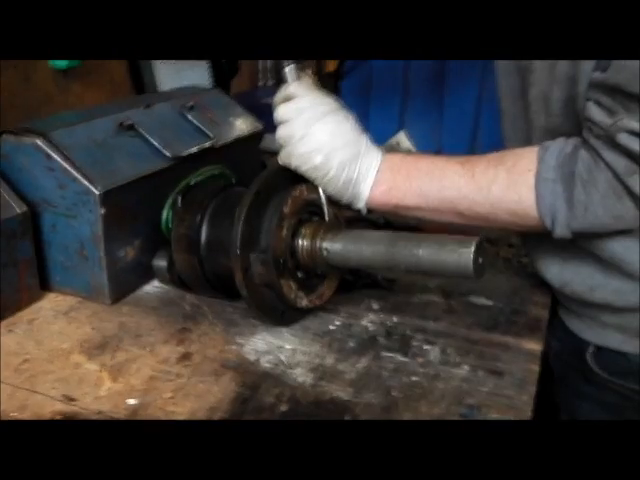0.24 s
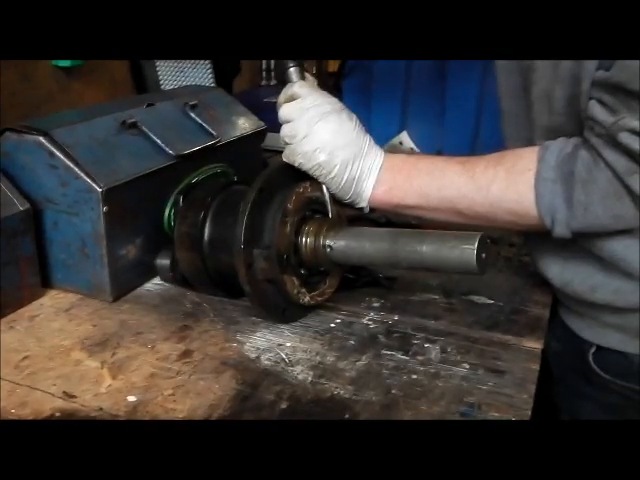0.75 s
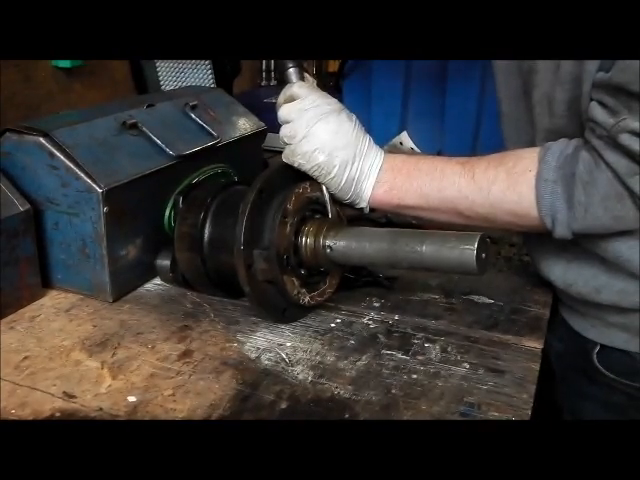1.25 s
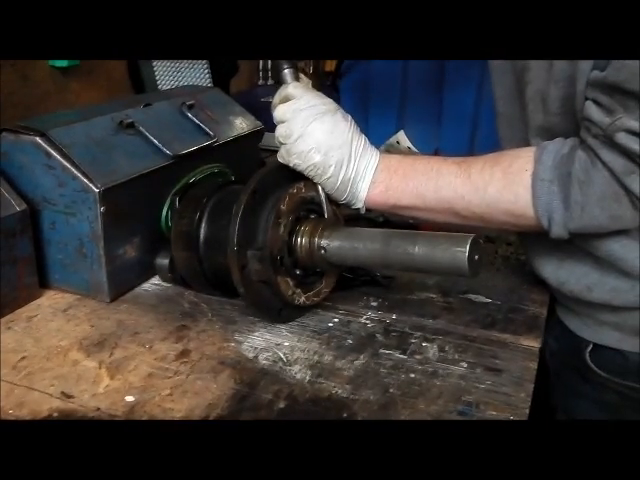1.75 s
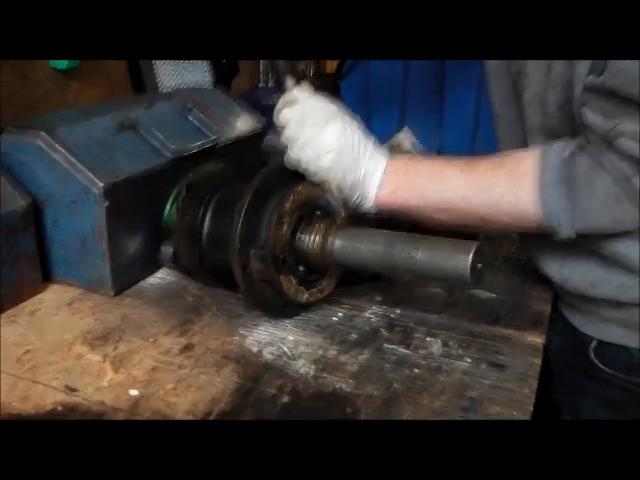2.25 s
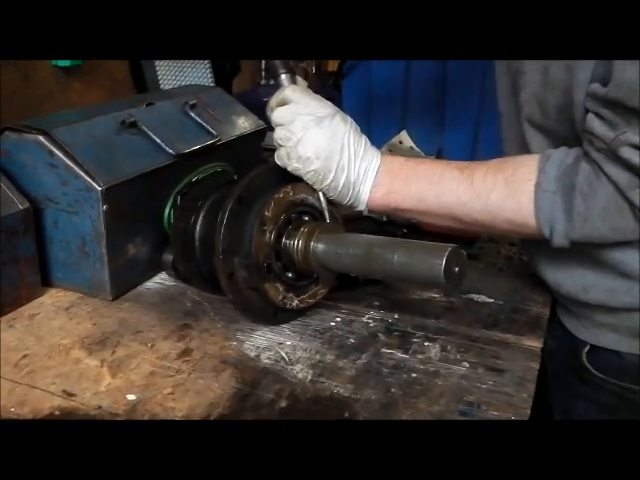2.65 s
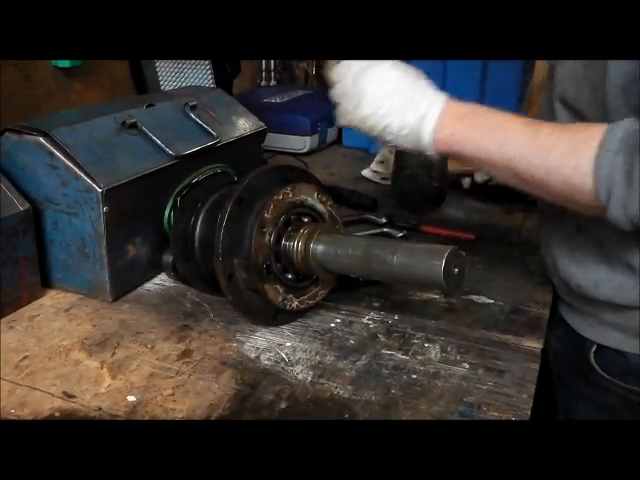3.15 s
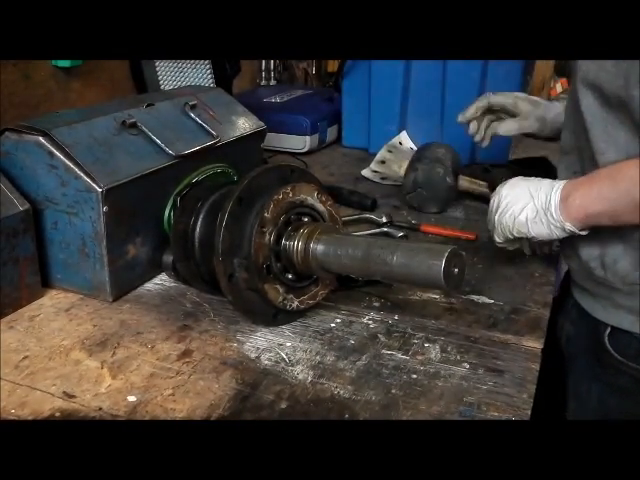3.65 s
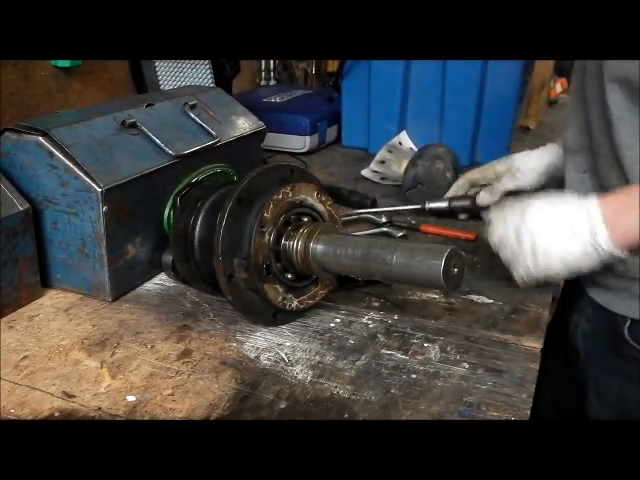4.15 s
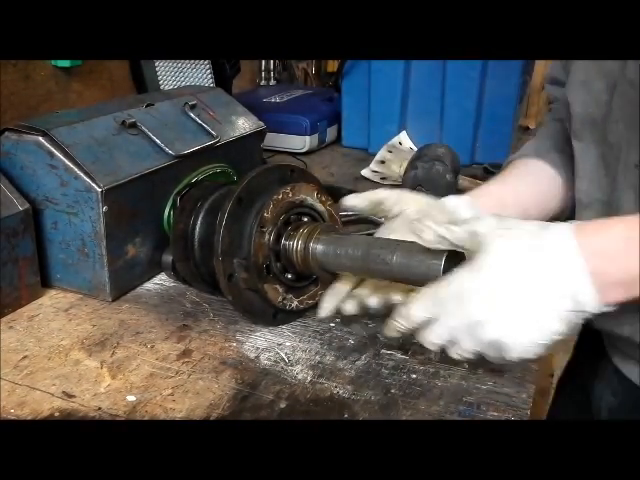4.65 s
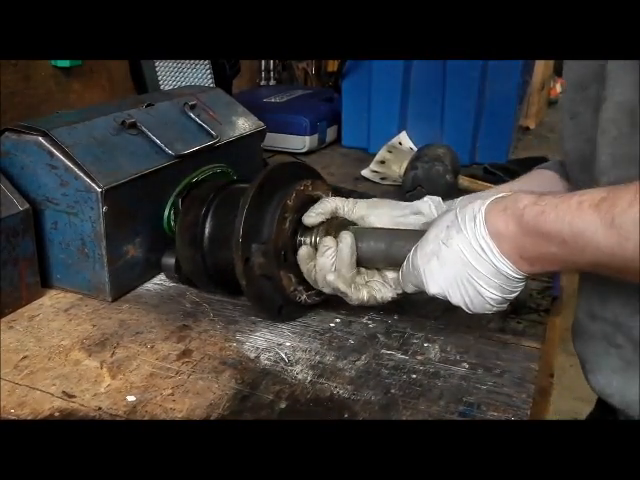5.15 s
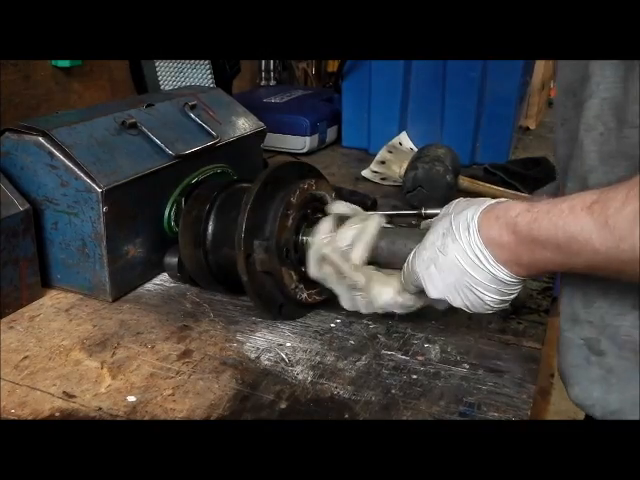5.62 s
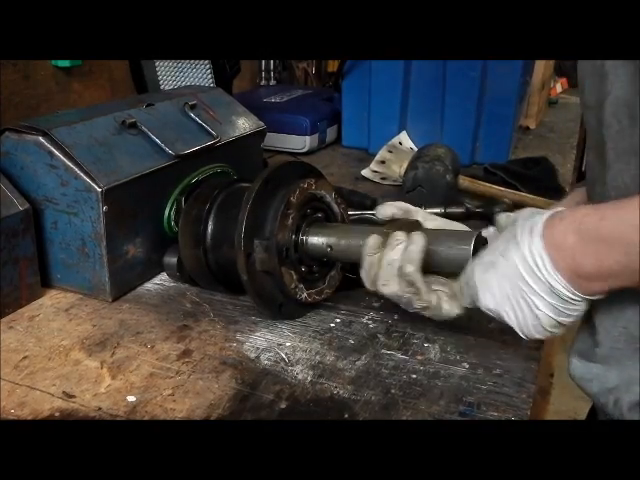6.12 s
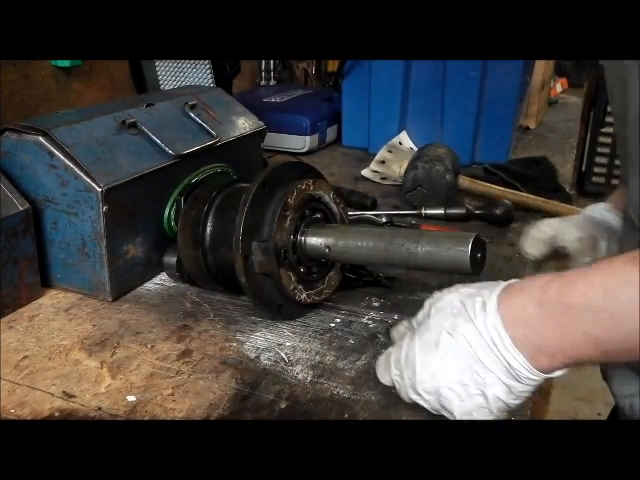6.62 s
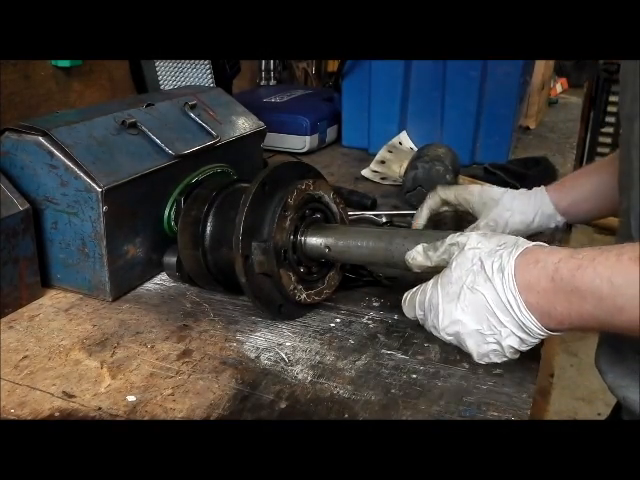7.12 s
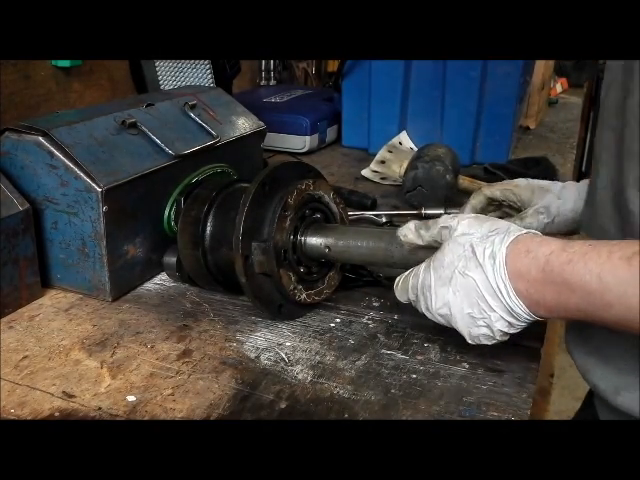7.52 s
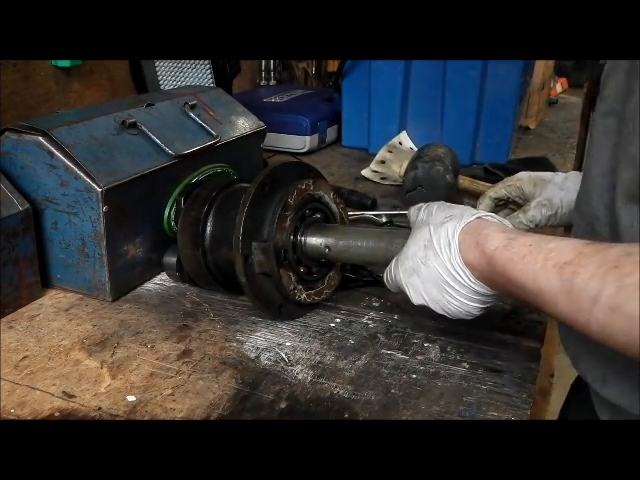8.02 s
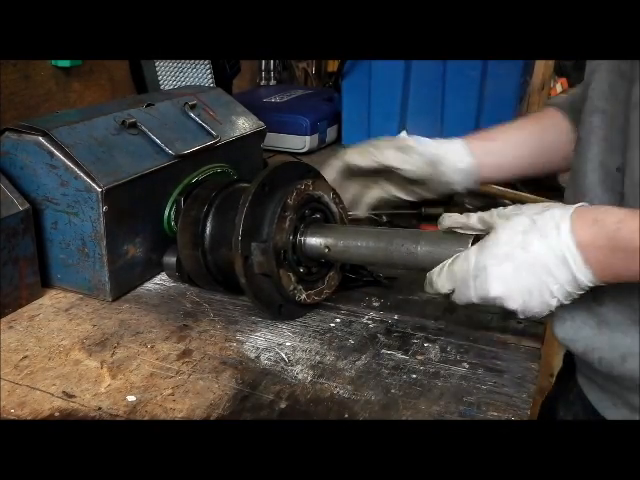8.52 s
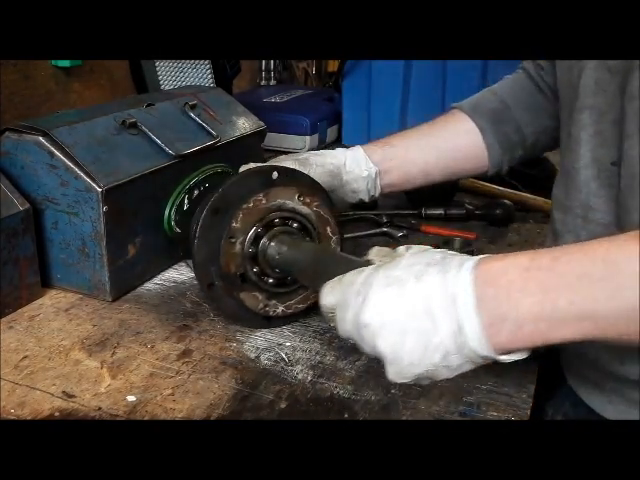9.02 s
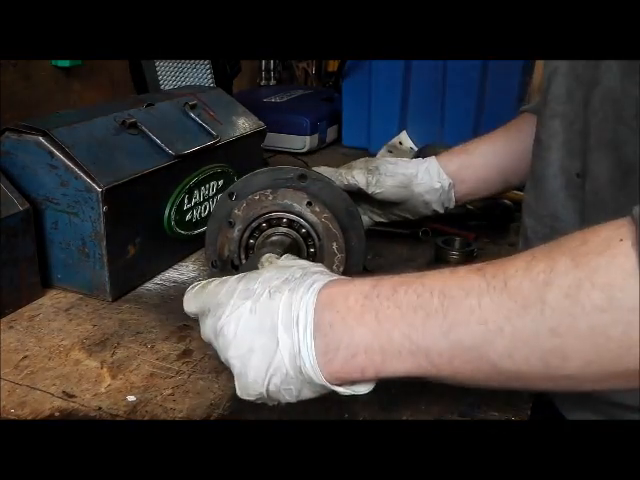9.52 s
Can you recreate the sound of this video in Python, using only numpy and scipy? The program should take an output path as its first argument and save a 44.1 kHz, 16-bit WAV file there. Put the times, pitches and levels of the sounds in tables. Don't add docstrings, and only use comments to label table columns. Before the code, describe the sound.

A mallet drives a chisel into a ringing steel hub with five bouncing, rattling blows, then tools clatter down and parts slide and clink.

```python
import sys
import numpy as np
from scipy import signal
from scipy.fft import rfft, irfft, next_fast_len
from scipy.io import wavfile
from scipy.ndimage import uniform_filter1d, map_coordinates

SR = 44100
rng = np.random.default_rng(int(sys.argv[2]) if len(sys.argv) > 2 else 0)


def generate_wav(signal):
    frames = np.transpose(np.atleast_2d(signal))
    scaled = np.clip(frames, -1, 1) * 32767
    pcm = np.round(scaled).astype(np.int16)
    wavfile.write(sys.argv[1], SR, pcm)


def undo_db(level):
    steps = np.asarray(level, float) / 20
    return 10 ** steps


N = 430857


def unit(x):
    return x / np.sqrt(np.mean(x ** 2) + 1e-20)


def along(points, hz):
    f, v = np.transpose(points)
    return np.interp(np.log(hz + 1), np.log(f + 1), v)


def level(rows):
    s, db = np.transpose(rows)
    return undo_db(np.interp(np.arange(N) / SR, s, db, -120, -120))


def strokes(rows):
    t = np.arange(0, N / SR + 0.002, 0.001)
    gain = sum(undo_db(db) * np.exp(-np.abs(2.34 * (t - s) / length) ** 3) for s, length, db in rows)
    return np.interp(np.arange(N) / SR, t, gain)


def wobble(rate):
    steps = np.arange(0, N + 32, 32)
    knots = rng.standard_normal(int(N * rate / SR) + 4)
    return np.interp(np.arange(N), steps, map_coordinates(knots, [steps * rate / SR]))


def filtered(x, response):
    n = x.shape[-1]
    m = next_fast_len(n + 4096)
    return irfft(rfft(x, m) * response(np.fft.rfftfreq(m, 1 / SR)), m)[..., :n]


def resonance(f, hz, width, gain_db):
    return undo_db(gain_db) * 1j * f * width / (hz * hz - f * f + 1j * f * width)


def modes(peaks, f):
    return sum((-1) ** k * resonance(f, *peak) for k, peak in enumerate(peaks))


def rush(response):
    m = next_fast_len(N)
    f = np.fft.rfftfreq(m, 1 / SR)
    spectrum = rng.standard_normal((2, len(f), 2)) @ [1, 1j]
    return unit(irfft(spectrum * response(f), m)[:, :N])


def echo(t):
    # frequency in Hz, reverberation time t60 in seconds.
    room_t60 = [(150, 0.43), (700, 0.34), (2000, 0.43), (5000, 0.33), (12000, 0.33)]
    hz = np.fft.rfftfreq(256, 1 / SR)
    frame = np.arange(len(t) // 128 + 2) * 128 / SR
    haze = rng.standard_normal((2, len(hz), len(frame), 2)) @ [1, 1j]
    dying = undo_db(-60 * frame / along(room_t60, hz)[:, None])
    tail = signal.istft(haze * dying, SR, nperseg=256)[1][:, :len(t)]
    lumps = np.interp(t * 220, np.arange(128), 2 * rng.standard_normal(128))
    build_up = (1 - np.exp(-t / 0.0065)) ** 2
    return undo_db(lumps) * tail * build_up * np.clip((t[-1] - t) / 0.05, 0, 1)


def contacts(rows, peaks, crack_db, crack_t60, room_db, rattle_db, far_ring):
    out, lead, size = np.zeros((2, N + SR)), 200, 20000
    t = np.maximum(np.arange(size) - lead, 0) / SR
    f = np.fft.rfftfreq(size, 1 / SR) + 1
    hz, width, gain_db = np.transpose(peaks)[:, :, None]
    sign = (-1) ** np.arange(len(peaks))[:, None]

    def detuned(spread):
        pitch = hz * (1 + spread * rng.standard_normal(hz.shape))
        return sign * resonance(f, pitch, width, gain_db)

    blow = (undo_db(-60 * t / crack_t60) + 1.2 * undo_db(-60 * t / 0.0049)) * (1 - np.exp(-t / 0.00072))
    for s, db, low_db, high_db, top_db, wet_db in rows:
        knocks = (rng.random(size) < 90 / SR) * (t > 0)
        knocks = knocks * undo_db(rattle_db - 60 * t / 0.4 + 2.0 * rng.standard_normal(size))
        crack = blow + np.convolve(knocks, undo_db(-60 * t[lead:2 * lead] / 0.0034))[:size]
        loose = rfft(knocks) * detuned(0.05).sum(axis=0)
        each = detuned(0.006)
        kicks = np.zeros(size)
        kicks[lead] = 1
        kicks[lead + rng.integers(20, 280, size=3)] = rng.uniform(-0.45, 0.45, size=3)
        colour = undo_db(along([(50, low_db - 27), (120, low_db + 9.5), (250, low_db + 8.5), (500, low_db + 16.5),
                            (1500, 0), (4200, high_db + 2), (7500, top_db), (15000, top_db - 10.5)], f))
        strengths = undo_db(2.2 * rng.standard_normal((2, len(peaks))))
        sides = np.array([np.ones(len(peaks)), rng.choice([-1, 1], len(peaks))])
        ring = (strengths * sides) @ each
        noise = rfft(rng.standard_normal((2, size)) * crack) / np.linalg.norm(blow)
        hit = irfft(colour * (undo_db(crack_db) * noise + rfft(kicks) * ring + loose * [[1], [0.7]]))
        wet = irfft(rfft(echo(t)) * colour * (undo_db(crack_db) + far_ring * ring[0]))
        wet = wet * undo_db(room_db + wet_db) * np.linalg.norm(hit[0]) / np.linalg.norm(wet[0])
        at = max(round(s * SR), 0)
        out[:, at:at + size] += (hit + wet) * undo_db(db) / np.abs(hit[0]).max()
    return out[:, lead:N + lead]


def family(rows, top_db, dry=0):
    return [(s, db, low_db, high_db, high_db + top_db, dry * db) for s, db, low_db, high_db in rows]


def ping(rows, clear, rough, room_db):
    out, t = np.zeros((2, N + SR)), np.arange(SR // 4) / SR
    for s, hz, db, t60 in rows:
        beat = 1 + 0.24 * np.sin(2 * np.pi * rng.uniform(32, 127) * t)
        span = max(2 + 5 * clear, round(0.7 * SR / hz))
        drift = uniform_filter1d(rng.standard_normal((2, len(t))), size=span)
        drift = unit(uniform_filter1d(drift, size=span))
        grit = clear * beat + rough * undo_db(-60 * t / 0.32) * drift
        turn = 2 * np.pi * hz * t
        shape = undo_db(db - 60 * t / t60) * (1 - np.exp(-t / (0.00025 + 0.14 / hz))) ** 2
        out[:, round(s * SR):][:, :len(t)] += shape * grit * [np.sin(turn), np.cos(turn)]
    tail = echo(np.arange(SR // 2) / SR)
    wet = signal.fftconvolve(out[:1], tail / np.linalg.norm(tail[0]), axes=1)
    return out[:, :N] + undo_db(room_db) * wet[:, :N]


def workshop_air():
    # frequency in Hz, level in dB per Hz.
    air_colour = [(18, -55), (30, -38), (71, -13), (103, -2), (127, -17), (153, -19), (272, -29),
                  (498, -20), (800, -20), (1040, -18.5), (5150, -21.5), (7840, -35), (9180, -35),
                  (15900, -42)]
    return undo_db(-40.5 + 0.98 * wobble(3.5)) * rush(lambda f: undo_db(along(air_colour, f)))


def mains_and_motors():
    # frequency in Hz, level in dB.
    motor_lines = [(833, -55), (1250, -82), (1890, -64.5)]
    t = np.arange(N) / SR
    tones = undo_db(-37.5 + 0.35 * wobble(4.4)) * np.sin(2 * np.pi * 100.22 * t)
    for hz, db in motor_lines:
        gain = undo_db(db + 2.0 + 0.49 * wobble(12.0))
        tones = tones + gain * np.sin(2 * np.pi * hz * t + 0.5 * wobble(6.6))
    return tones


def mallet():
    # start in seconds, touch, blow and rebound levels in dB, flight to the rebound in seconds.
    strikes = [
        (0.0003, -9, 0.5, -2, 0.027),
        (0.2916, -12, -1, -2.5, 0.031),
        (0.6022, -9.5, 6, -1, 0.035),
        (1.4387, -9.5, 4, 2.5, 0.0348),
        (2.3205, -0.5, 5.5, 2, 0.036),
    ]
    # low, high and top tone in dB, room in dB.
    stages = [
        (-17, -11, -10.5, -1),
        (-11, -8, -17, -10),
        (-10, -5, -15, -0.5),
        (-10.5, -2, -13, 3.5),
    ]
    touch_s, settle_db = 0.0155, -11
    rows = []
    for s, touch_db, blow_db, back_db, flight in strikes:
        steps = [(s - touch_s, touch_db), (s, blow_db), (s + flight, back_db),
                 (s + 2 * flight, back_db + settle_db)]
        for step, colour in zip(steps, stages):
            if step[0] > -touch_s / 2:
                rows.append((*step, *colour))
    return rows


def hub_and_chisel():
    # start in seconds, peak in dB, low and high tone in dB.
    shifts = [(0.184, -32, -11, -1), (0.415, -21, -26, 7), (0.5782, -20, -8, 5), (0.7194, -16, 6, 9),
              (1.4133, -25, -33, -11), (1.7046, -26, -6, -2), (1.7535, -28, -32, -7),
              (1.9857, -30.5, -23, -7), (2.4381, -6.5, -3.5, -3), (2.4960, -22, -3, 5),
              (2.5887, -27.5, 14, 13)]
    # frequency in Hz, width in Hz, level in dB.
    steel = [(633, 26, -8), (1740, 59, -10), (1892, 16.6, 4), (2200, 30, -1.5), (2574, 29, -6),
             (2690, 42, -3), (2978, 46, -3.5), (3300, 51, -7), (3790, 59, -6.5), (4224, 45, -15),
             (4436, 63, -1), (4600, 24, -9.5), (5470, 92, -7), (10560, 60, -17)]
    return contacts(mallet() + family(shifts, top_db=-5.5), steel, crack_db=-14.0, crack_t60=0.046,
                    room_db=-0.5, rattle_db=-7, far_ring=0.049)


def chisel_chatter():
    # start in seconds, frequency in Hz, level in dB, t60 in seconds.
    catches = [(0.013, 1960, -22, 0.056), (0.026, 730, -2.5, 0.017), (0.032, 4520, -5.5, 0.027),
               (0.034, 5640, -7.5, 0.04), (0.036, 10560, -25, 0.082), (0.042, 2080, -9, 0.034),
               (0.092, 2010, -22, 0.068), (0.293, 1895, -17, 0.31), (0.308, 5550, -13, 0.054),
               (0.308, 10560, -27, .09), (0.321, 630, -11.5, 0.041), (1.424, 1620, -13, 0.035),
               (0.351, 806, -9, 0.024), (0.607, 4560, -3, .03), (0.618, 5400, -13, .03),
               (0.622, 10560, -18, 0.054), (0.624, 5560, -8.5, 0.034), (0.64, 10560, -30, .06),
               (0.654, 2130, -9, 0.031), (0.672, 2170, -11, 0.033), (0.664, 4080, -14, .03),
               (0.699, 4050, -19, 0.066), (0.763, 6460, -30, .02), (1.44, 4450, -8, 0.038),
               (1.452, 10560, -26, 0.11), (1.453, 5640, -17, 0.058), (1.474, 4400, -11, 0.076),
               (1.493, 2200, -15, 0.084), (1.508, 1920, -12, 0.056), (1.437, 658, -5, 0.066),
               (1.478, 1897, -9, 0.22), (1.565, 520, -16.5, 0.05), (2.306, 1594, -8, 0.057),
               (2.306, 2520, -5, .03), (2.323, 4420, 1.5, 0.023), (2.326, 5540, -13.5, 0.09),
               (2.359, 4570, -9, .035), (2.389, 2164, -11, 0.1), (2.44, 7060, -28, 0.11),
               (2.474, 5320, -21, .12), (2.357, 1680, -11, 0.09)]
    return ping(catches, clear=1, rough=0.5, room_db=-13)


def bench_thuds():
    # start in seconds, level in dB, length in seconds.
    rocks = [(0.045, -11.5, 0.048), (0.105, -27, 0.023), (0.288, -21, 0.021), (0.348, -10.5, 0.025),
             (0.393, -19, 0.02), (0.403, -26, 0.088), (0.492, -19, 0.0062), (0.597, -18.5, 0.029),
             (0.684, -25, 0.031), (1.058, -26, 0.014), (1.427, -17.5, 0.024), (1.53, -34, 0.042),
             (1.889, -24, 0.033), (2.309, -17, 0.027), (2.397, -30, .012), (2.456, -13.5, 0.026),
             (2.526, -14, 0.046), (2.58, -25, 0.018)]
    # start in seconds, level in dB, length in seconds.
    shoves = [(3.264, -14.5, 0.041), (3.33, -29, 0.061), (3.47, -23, 0.013), (3.488, -24.5, 0.059),
              (3.635, -16, 0.043), (3.654, -18, 0.055), (3.871, -26, 0.03), (4.099, -33, 0.025),
              (4.22, -21.5, 0.023), (4.281, -21, 0.023), (4.325, -24, 0.038), (4.379, -22, 0.014),
              (4.669, -34, 0.017), (5.191, -30, 0.018), (5.282, -35, 0.024), (5.335, -31, 0.057),
              (5.665, -17.5, 0.097), (5.93, -24, 0.029), (6.05, -30, 0.025), (7.278, -32, 0.038),
              (7.333, -33, 0.058), (9.003, -24.5, 0.065), (9.085, -27, 0.086), (9.146, -16, 0.028),
              (9.203, -26, 0.066), (9.288, -24, 0.065), (9.371, -27, 0.019), (9.411, -30, 0.051),
              (9.51, -33, 0.024)]
    thuds = [(s, db, length, 95) for s, db, length in rocks]
    thuds += [(s, db, length, 99.2 + 32.5 * np.exp(-length / 0.033)) for s, db, length in shoves]
    droop, quiet_db = 0.48, -30
    out = np.zeros((2, N + SR))
    for s, db, length, hz in thuds:
        start, lag = rng.uniform(-np.pi, np.pi, 2)
        t = np.arange(round((length + 0.0047) * SR)) / SR
        edges = np.clip(np.minimum(t, t[-1] - t) / 0.0076, 0, 1)
        swing = np.sin(2 * np.pi * hz * t + start + 0.14 * lag * np.array([[1], [-1]]))
        fade = undo_db(db - droop * (db - quiet_db) * t / t[-1] + 3)
        out[:, round((s - 0.006) * SR):][:, :len(t)] += fade * edges * swing
    return out[:, :N]


def metal_ticks():
    # start in seconds, middle frequency in Hz, level in dB, t60 in seconds.
    bursts = [(0.081, 9850, -15, 0.056), (0.092, 6440, -24, .04), (0.117, 7100, -18, .04),
              (0.282, 10700, -29, 0.018), (0.328, 4500, -2.5, .04), (0.335, 6550, -21, .03),
              (0.381, 9000, -16, .04), (0.413, 9540, -20, .06), (0.583, 7050, -16, .015),
              (0.587, 3060, -9, 0.022), (0.59, 7440, -20, .02), (0.619, 8430, -9, .05),
              (0.695, 9000, -16, .03), (1.413, 2760, -11, 0.02), (1.534, 5470, -30, .02),
              (1.564, 6400, -23, .015), (1.604, 6170, -14.5, 0.017), (1.604, 11700, -27, .015),
              (2.317, 5000, -21, .015), (2.326, 9400, -9, .03), (2.422, 4040, -11, .02),
              (2.436, 9000, -15, .05), (2.496, 5470, -19, .02), (5.653, 2550, -21, .03),
              (6.452, 4200, -22, 0.045), (7.345, 1810, -12, 0.33), (8.94, 2560, -27, .05),
              (5.728, 1810, -27, 0.026), (9.297, 3900, -26, .07), (9.3, 11300, -24, .07),
              (9.306, 4430, -23, .05), (9.32, 6500, -35, .05), (9.37, 6000, -30, .04)]
    return ping(bursts, clear=0, rough=0.62, room_db=-7.5)


def mallet_laid_down():
    # start in seconds, peak in dB, low and high tone in dB.
    knocks = [(1.0525, -33.5, -3, -20), (1.07, -26, -6, -28), (1.8853, -28.5, -5, -7),
              (3.261, -21.5, 13, 2), (3.4783, -28.5, 6, -3), (3.6375, -3.5, -3.5, -12.5),
              (3.8796, -30, 16, 14), (4.6524, -38, 12, -6), (4.9844, -30, 5, 7), (9.021, -30.5, 12, -14),
              (9.1317, -13, 3.5, -9)]
    # frequency in Hz, width in Hz, level in dB.
    top = [(390, 20, 5.5), (558, 22, -3), (682, 43, -2), (870, 12, 7), (1070, 34, -1), (1220, 34, -5)]
    return undo_db(3.5) * contacts(family(knocks, top_db=-13.0), top, crack_db=-2.5, crack_t60=0.036,
                               room_db=-2.0, rattle_db=-14, far_ring=0.64)


def gloves():
    # middle in seconds, length in seconds, level in dB.
    rustles = [(3.08, 0.024, -47), (3.55, 0.16, -49.5), (3.904, 0.11, -46), (4.2, 0.26, -51.5),
               (4.623, 0.057, -49), (4.87, .2, -42.5), (5.083, 0.29, -47), (5.33, 0.19, -44.5),
               (5.52, 0.11, -49), (5.7, 0.19, -41.5), (5.79, 0.17, -41), (5.947, 0.012, -37),
               (6.02, 0.22, -45.5), (6.15, 0.12, -43), (6.4, 0.29, -47), (7.04, .1, -55), (7.92, .2, -52.5),
               (8.473, 0.3, -42.5), (8.94, 0.051, -42), (9.3, 0.19, -42), (9.68, 0.34, -54.5)]
    # frequency in Hz, level in dB per Hz.
    swish = [(1500, -40), (4000, -14), (6500, -6), (9500, 0), (12000, -2), (16000, -8)]
    flutter = undo_db(1.5 * wobble(40) + 1.5 * wobble(200))
    return strokes(rustles) * flutter * rush(lambda f: undo_db(along(swish, f)))


def small_pings():
    # start in seconds, frequency in Hz, level in dB, t60 in seconds.
    rings = [(3.644, 540, -7, 0.044), (3.654, 390, -10, 0.052), (3.672, 420, -15, 0.052),
             (3.708, 692, -29, 0.16), (4.88, 3300, -35, .03), (5.728, 875, -21, .04),
             (8.808, 845, -24.5, 0.047), (4.292, 1308, -13, 0.077), (5.073, 3060, -25, 0.026),
             (5.085, 5930, -37, 0.092), (5.094, 2750, -29, .04), (5.185, 5170, -33, 0.11),
             (5.187, 2440, -23, .025), (5.188, 5850, -34, .06), (5.653, 2335, -14, 0.044),
             (5.661, 1083, -11.5, 0.032), (5.918, 3330, -26, .02), (5.918, 5900, -32, .02),
             (5.925, 1090, -17.5, 0.031), (7.263, 2580, -9, 0.018), (7.284, 3580, 4, 0.014),
             (7.284, 2385, 2.5, 0.021), (7.288, 10380, -32, 0.31), (8.808, 1100, -25, 0.059),
             (8.808, 3100, -42, 0.013), (8.808, 5670, -33, .02), (8.915, 940, -34, .05),
             (8.928, 1093, -29.5, 0.14), (8.94, 3200, -30, .04), (9.133, 2540, -23.5, 0.083),
             (9.134, 5852, -28.5, 0.087), (9.143, 590, -35, 0.055), (9.258, 8565, -25.5, 0.16),
             (9.258, 5760, -20, 0.18), (9.262, 5030, -25, 0.17), (9.259, 12800, -36, .15),
             (9.3, 12600, -30, .12), (9.278, 2320, -24, .03), (9.297, 2330, -17, 0.12),
             (9.3, 6020, -18, 0.12), (9.302, 9200, -31, 0.13), (9.408, 5360, -29, 0.047),
             (9.481, 2400, -29.5, 0.073)]
    return ping(rings, clear=1, rough=0.5, room_db=-12)


def chisel_dropped():
    # start in seconds, peak in dB, low and high tone in dB.
    drops = [
        (4.2140, -14, 1, -16),
        (4.2455, -17, -3, -11),
        (4.271, -23, -6, -11),
        (4.2775, 3, -16, -12.5),
        (4.2935, -9.5, -14, -29),
        (5.3842, -31, 0, 6),
    ]
    # frequency in Hz, width in Hz, level in dB.
    clatter = [(406, 36, -5.5), (790, 26, 7.5), (1020, 340, 0), (1260, 31, -4), (1637, 18, -22),
               (1820, 25, 3.5), (2040, 210, -8), (2750, 7.7, -20)]
    return undo_db(6.0) * contacts(family(drops, top_db=-22, dry=0.27), clatter, crack_db=-3, crack_t60=0.022,
                               room_db=-5.5, rattle_db=-11.0, far_ring=0.97)


def scrapes():
    # middle in seconds, length in seconds, level in dB.
    rubs = [
        (4.87, 0.17, -43),
        (5.095, 0.11, -30),
        (5.5, 0.044, -41.5),
        (5.63, 0.014, -37),
        (5.77, 0.18, -33.5),
    ]
    # middle in seconds, length in seconds, level in dB.
    drags = [
        (5.0, 0.07, -41),
        (5.37, 0.14, -43),
        (6.45, 0.33, -45.5),
        (8.86, 0.13, -46),
        (8.94, 0.064, -40),
        (9.06, 0.92, -44),
        (9.16, 0.25, -37.5),
        (9.3, 0.033, -26),
        (9.38, 0.22, -34),
        (9.5, 0.15, -38),
    ]
    # frequency in Hz, level in dB per Hz.
    rasp = [(400, -7.5), (1200, -10), (2600, -4), (3800, -6), (5700, -6), (7500, -19), (15900, -24)]
    # frequency in Hz, level in dB per Hz.
    grit = [(120, -19), (200, -7.5), (299, -12), (482, -7), (2050, -13), (3240, -14), (10800, -30),
            (15900, -36)]
    grains = undo_db(1.9 * wobble(170) + 0.57 * wobble(28))
    wood = strokes(drags) * rush(lambda f: undo_db(along(grit, f)))
    steel = strokes(rubs) * rush(lambda f: undo_db(along(rasp, f)))
    return grains * (wood + steel)


def collar_taps():
    # start in seconds, peak in dB, low and high tone in dB.
    taps = [
        (5.1846, -22, -0.5, -3),
        (5.6526, -12, -7.5, -7.5),
        (5.7264, -23.5, -2, 1),
        (5.9170, -19.5, -4, -8),
        (6.0404, -24, 14, -4),
        (6.0521, -28, -6, -15),
        (8.8084, -25, 4, 15),
        (8.9316, -29, -6, 23),
        (9.2035, -30, -9, 13),
        (9.4544, -35, -13, -4),
    ]
    # frequency in Hz, width in Hz, level in dB.
    shaft = [(830, 74, -3), (1058, 33, 6.5), (2030, 39, -5), (2376, 100, 11), (2740, 66, 8), (3157, 110, 8),
             (4550, 80, -3), (5870, 83, 6)]
    return undo_db(7.0) * contacts(family(taps, top_db=-14), shaft, crack_db=-3.0, crack_t60=0.034,
                               room_db=-4.0, rattle_db=-31, far_ring=0.88)


def collar_slide():
    # time in seconds, level in dB.
    pull = [(6.09, -57), (6.14, -39), (6.2, -38), (6.3, -48), (6.38, -42), (6.45, -36), (6.52, -46),
            (6.59, -43), (6.63, -73)]
    # frequency in Hz, width in Hz, level in dB.
    collar = [(4050, 70, -3), (5000, 70, -4), (8400, 220, 0), (10450, 70, -3), (10840, 70, -3),
              (11000, 60, -6)]
    song = 0
    for group in (collar[:2], collar[2:3], collar[3:4], collar[4:]):
        slip = undo_db(3.5 * wobble(16) + 2.2 * wobble(130) - 6.5 + group[0][2])
        song = song + slip * rush(lambda f: modes(group, f + 1))
    return level(pull) * song


def collar_set_down():
    # start in seconds, peak in dB, low and high tone in dB.
    landings = [
        (7.2628, -13, -7.5, -18),
        (7.2833, -3, -15.5, -10),
    ]
    # frequency in Hz, width in Hz, level in dB.
    wood = [(1026, 140, -6), (1560, 39, -9), (1890, 36, -6), (2650, 25, -19), (3430, 20, -15)]
    return undo_db(9.0) * contacts(family(landings, top_db=-21, dry=0.87), wood, crack_db=-6.0, crack_t60=0.017,
                               room_db=6.5, rattle_db=-23, far_ring=0.76)


def bearing_clinks():
    # start in seconds, peak in dB, low and high tone in dB.
    clinks = [
        (9.2579, -18.5, -9, -13),
        (9.2774, -14, -20, -8),
        (9.2993, -12.5, -11, -7),
        (9.4094, -33, -19, -9),
    ]
    # frequency in Hz, width in Hz, level in dB.
    rings = [(2200, 54, -12), (2550, 64, -8), (5250, 48, 1), (5520, 65, -8), (5900, 72, -6), (6170, 80, 0),
             (9200, 90, -16), (11400, 120, -9), (12800, 80, -10)]
    return undo_db(3.0) * contacts(family(clinks, top_db=-5.0), rings, crack_db=-23.0, crack_t60=0.047,
                               room_db=-2.0, rattle_db=-5, far_ring=0.63)


def ports(pair):
    # frequency in Hz, left-right likeness from -1 to 1.
    likeness = [(60, -0.06), (130, 0.78), (290, 0.83), (640, 0.92), (1410, 0.89), (3100, 0.54),
                (6820, 0.069), (15000, -0.48)]

    def spread(hz):
        turn = np.arccos(np.clip(along(likeness, hz), -1, 1)) / 2
        return np.array([np.cos(turn), np.sin(turn)])

    mid, side = filtered(pair, spread)
    return np.array([mid + side, mid - side])


def scene():
    hits = hub_and_chisel() + mallet_laid_down() + chisel_dropped()
    hits = hits + collar_taps() + collar_set_down() + bearing_clinks()
    handling = gloves() + scrapes() + collar_slide()
    small_metal = chisel_chatter() + metal_ticks() + small_pings()
    airborne = workshop_air() + hits + handling + small_metal
    return ports(airborne) + bench_thuds() + mains_and_motors()


def wind_filter(x):
    # start in seconds, end in seconds.
    engaged = [(0.12, 0.172), (0.185, 0.2), (0.242, 0.273), (0.51, 0.556), (0.791, 0.892), (0.925, 0.959),
               (1.126, 1.257), (1.639, 1.788), (1.951, 2.068), (2.116, 2.175), (2.621, 2.752),
               (2.772, 2.797), (3.4, 3.454), (3.551, 3.596), (3.724, 3.761), (3.912, 4.06), (4.126, 4.207),
               (4.405, 4.476), (4.507, 4.522), (4.698, 4.715), (5.981, 6.041), (6.086, 6.186),
               (7.425, 7.488)]
    t = np.arange(N) / SR
    shut = sum(np.clip(np.minimum(t - a, b - t) / 0.0018 + 0.5, 0, 1) for a, b in engaged)
    bass = filtered(x, lambda f: 1 / (1 + (f / 190) ** 8))
    return x - bass * np.clip(shut, 0, 1) * (1 - undo_db(-16.5))


def band_limit(x):
    return signal.sosfilt(signal.butter(12, 16080, fs=SR, output="sos"), x)


def record(dry):
    # frequency in Hz, left minus right in dB.
    lean = [(60, -1), (240, -1), (1000, -1.5), (2200, -1.5), (5000, 1), (9000, -0.5), (15000, -2.5)]
    x = wind_filter(dry)
    x = x / (1 + np.abs(x) ** 30) ** (1 / 30)

    def microphones(f):
        seam = 1 - (1 - undo_db(-50)) * np.exp(-((f - 7900) / 160) ** 2)
        return seam * undo_db(along(lean, f) / 2 * np.array([[1], [-1]]))

    return band_limit(filtered(x, microphones))


dry = scene()
out = record(dry)
generate_wav(out)
```